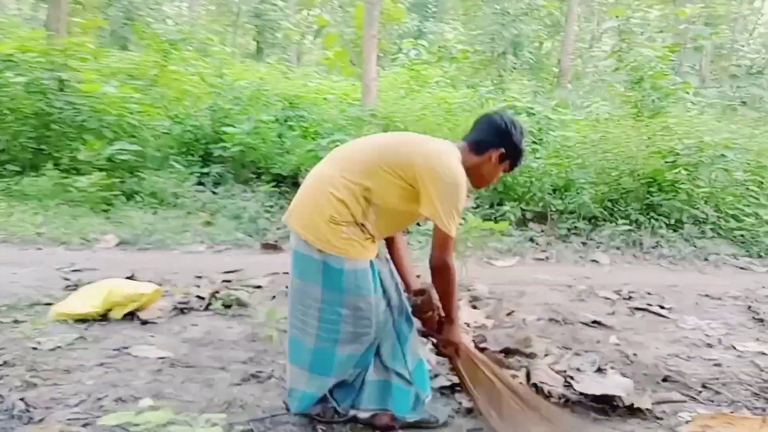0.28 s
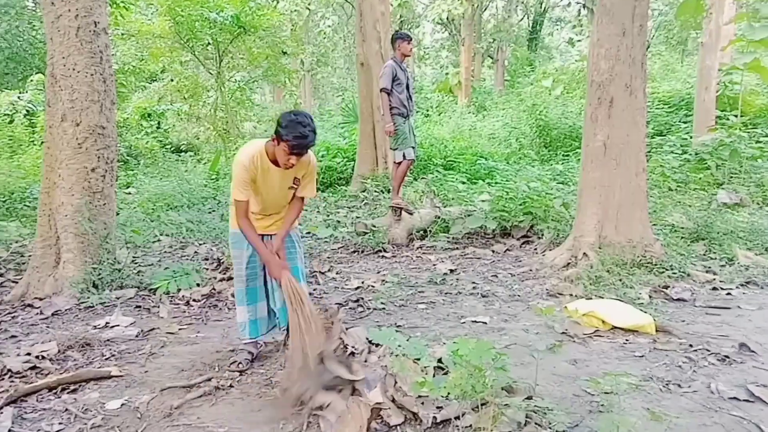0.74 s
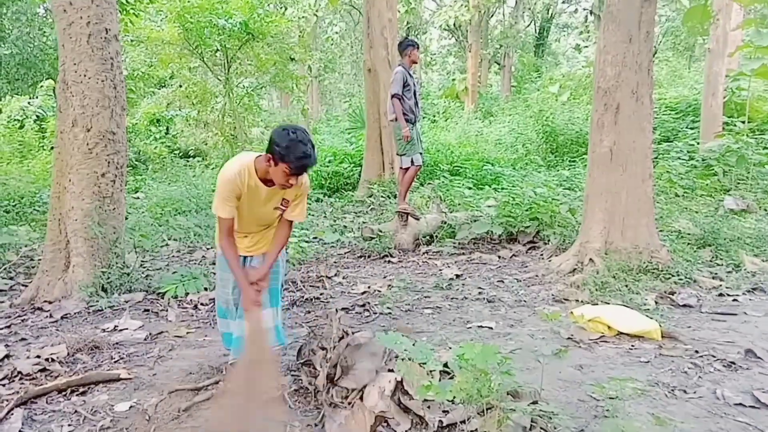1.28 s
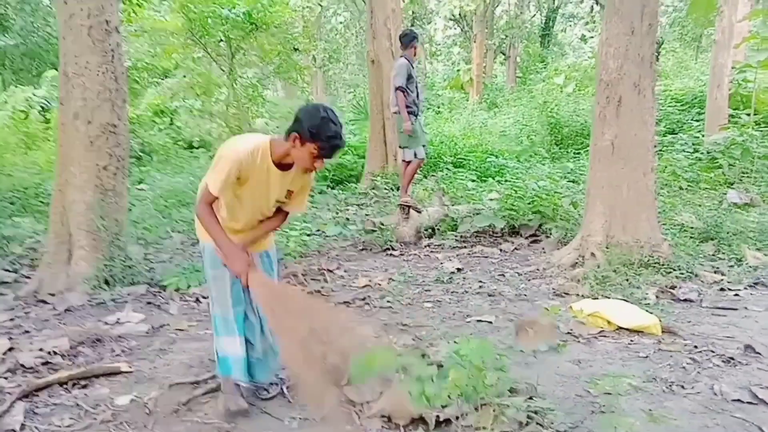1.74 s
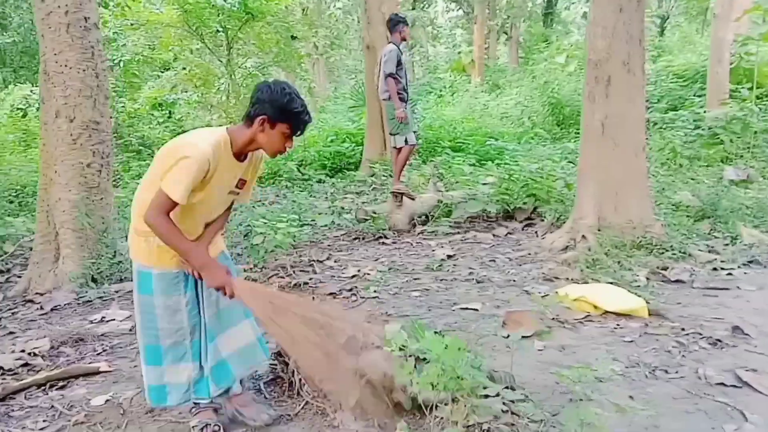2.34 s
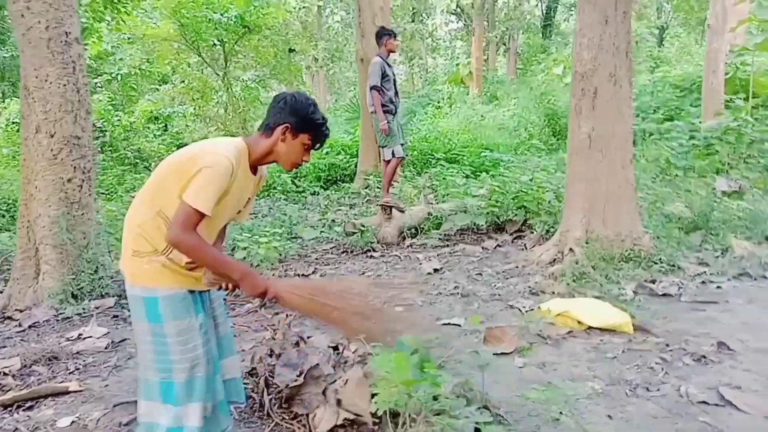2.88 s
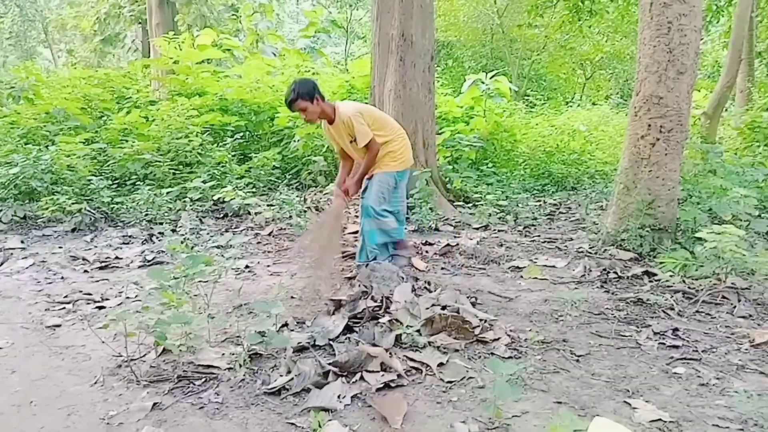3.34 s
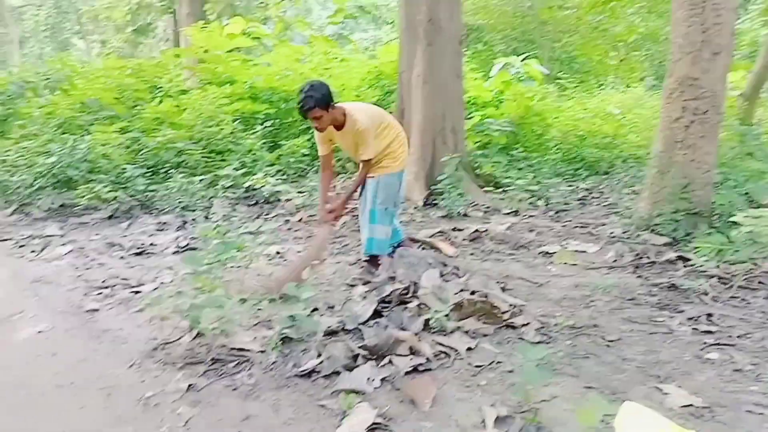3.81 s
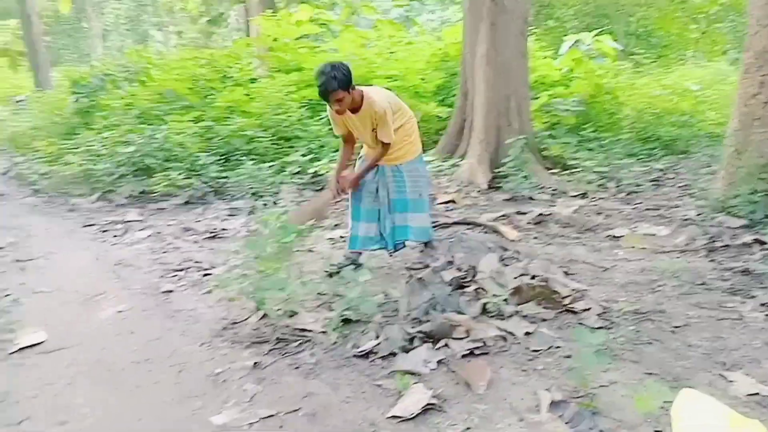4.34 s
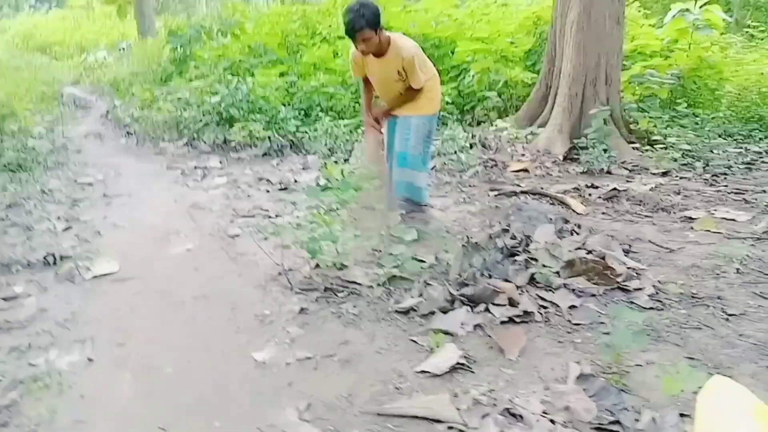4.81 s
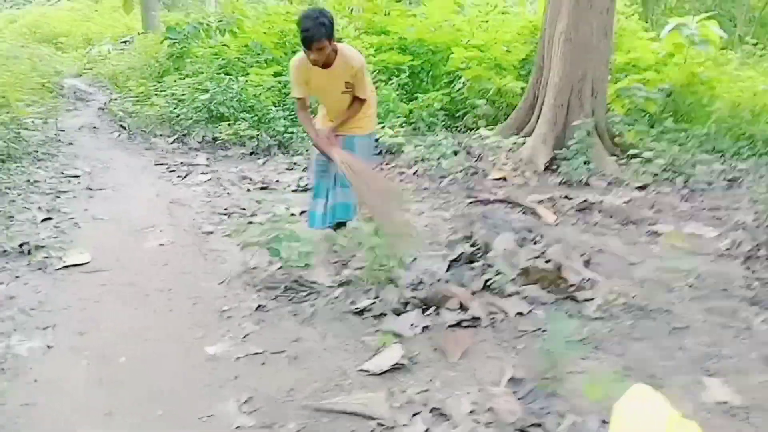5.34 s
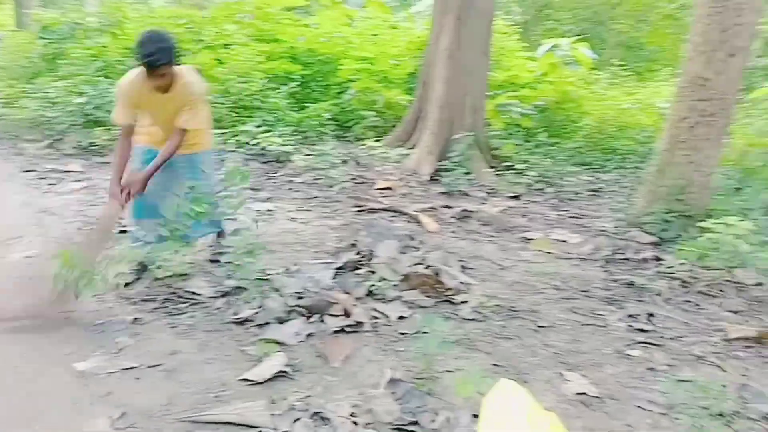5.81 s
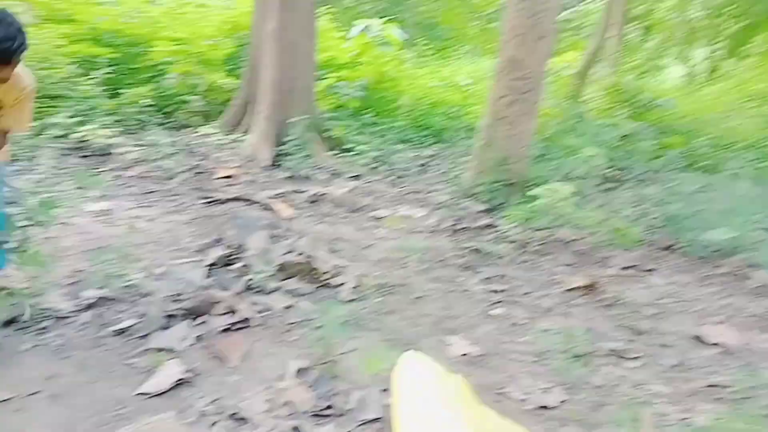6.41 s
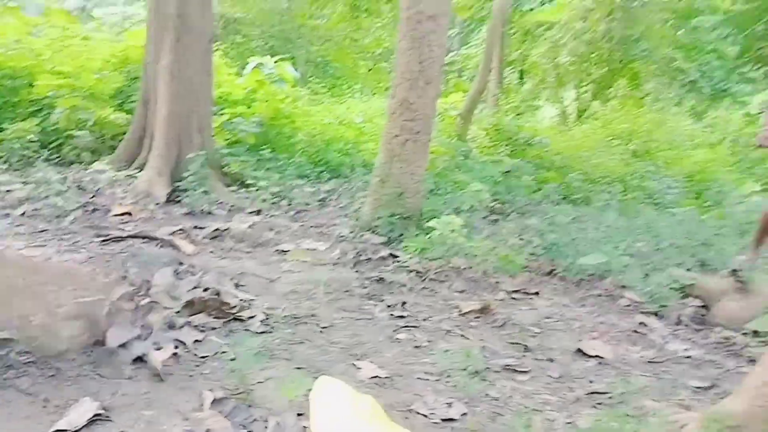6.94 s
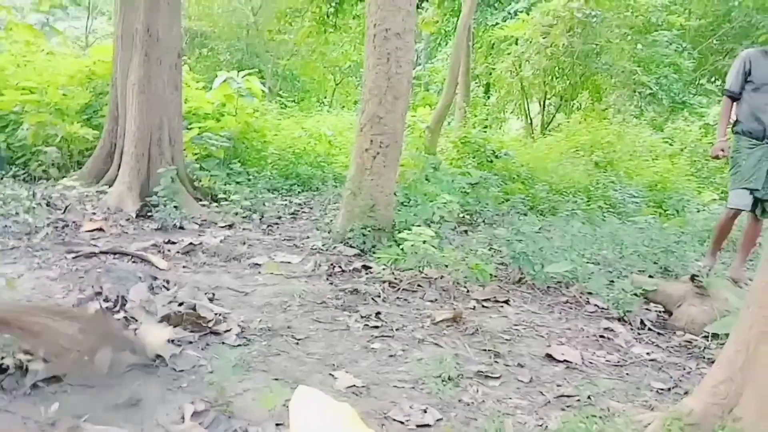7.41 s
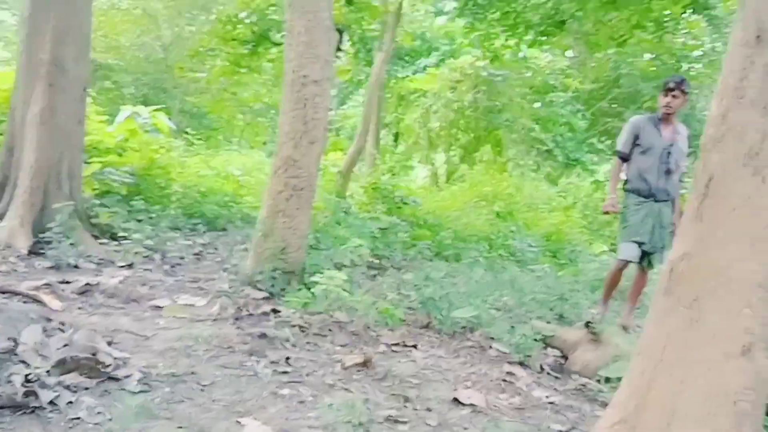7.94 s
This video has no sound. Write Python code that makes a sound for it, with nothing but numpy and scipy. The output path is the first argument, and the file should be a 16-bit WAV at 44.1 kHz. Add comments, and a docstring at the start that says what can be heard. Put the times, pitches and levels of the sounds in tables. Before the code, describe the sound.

Outdoors in woodland, a stiff twig broom scrapes dry leaves and soil near a phone microphone. The first strokes are soft and quick, then stronger crunchy swishes come singly or in pairs with short pauses. Twigs snap and leaves crackle now and then. The final strokes are loud, close and gritty. Behind lie faint foliage rustle, a thin high insect buzz and a very low far engine drone.

```python
"""Sweeping dry leaves

A short twig broom sweeps dry leaves and dirt on a woodland path, near a phone microphone.
Clumped clicks over hiss, shaped by a spectrum per layer, make the scrape of soil, rustle of leaves and hiss of grit.
Dying rings make the cracks, and narrow bands of noise make faint whistles; short echoes colour the sweeping.
Behind are rustling trees, a pulsed-noise insect, a low noise rumble and an engine built from sine orders."""
import sys
import numpy as np
from scipy import signal
from scipy.fft import rfft, irfft, next_fast_len
from scipy.io import wavfile
from scipy.ndimage import uniform_filter1d, map_coordinates

SR = 44100
rng = np.random.default_rng(int(sys.argv[2]) if len(sys.argv) > 2 else 0)


def to_wav(sig):
    """Store sig (one row per channel, or 1-D mono) as 16-bit WAV at the path in sys.argv[1].

    Samples outside -1..1 are clipped; the rate is SR.
    """
    pcm = np.clip(np.atleast_2d(sig), -1, 1) * 32767
    pcm = np.round(pcm).astype(np.int16)
    wavfile.write(sys.argv[1], SR, pcm.T)  # frames by channels


N = 360738
TIME = np.arange(N) / SR  # seconds


def gain_of(db):
    """Logarithmic level: 20 dB is a tenfold amplitude."""
    return 10 ** (np.asarray(db) / 20)


def evened(x):
    """Normalization: scales a signal to an rms of 1."""
    return x / np.sqrt(np.mean(x ** 2) + 1e-20)


def read(points, hz):
    """Interpolation of a spectrum in dB along a logarithmic frequency axis."""
    point_hz, db = np.transpose(points)
    return np.interp(np.log(hz + 1), np.log(point_hz + 1), db)


def filtered(x, order, hz, kind="low"):
    """Causal Butterworth filtering: a flat passband with smooth skirts."""
    return signal.sosfilt(signal.butter(order, hz, kind, fs=SR, output="sos"), x)


def coloured(x, spectrum, patchy_db, patch_hz, patch_s, size=256):
    """Time-varying filtering: a fixed spectrum whose level drifts in random patches of pitch and time."""
    overlap = 3 * size // 4
    hz, t, bins = signal.stft(x, SR, nperseg=size, noverlap=overlap)
    field = rng.standard_normal(bins.shape[::-1]).T
    # Gaussian blur turns independent random levels into smooth patches
    across_pitch = np.exp(-0.5 * (np.arange(-24, 25) * hz[1] / patch_hz) ** 2)
    across_time = np.exp(-0.5 * (np.arange(-100, 101) * t[1] / patch_s) ** 2)
    patches = evened(signal.fftconvolve(field, np.outer(across_pitch, across_time), "same"))
    bins = bins * gain_of(read(spectrum, hz)[:, None] + patchy_db * patches)
    shaped = signal.istft(bins, SR, nperseg=size, noverlap=overlap)[1]
    return evened(shaped[:N])


def scratch(per_s, spread_db, hiss, clump_db, clump_hz):
    """Stick-slip friction: uneven clicks over a smooth hiss, in clumps as twigs catch and slip."""
    chance, size = rng.random(N), rng.exponential(1, N)
    smooth, clump = rng.standard_normal(N), rng.standard_normal(N)
    struck = chance < per_s / SR
    clicks = struck * np.sign(smooth) * gain_of(spread_db * np.minimum(size, 4))
    clumps = evened(filtered(clump, 1, clump_hz))
    # reversed, the hiss is unrelated to the signs of the clicks
    return gain_of(clump_db * clumps) * (evened(clicks) + hiss * smooth[::-1])


# Pushes of the broom. Each row: start in seconds, rise in seconds, hold in seconds, leaf rustle in dB,
# soil scrape in dB above the rustle, grit hiss in dB above the rustle, settling litter in dB above the push.
PUSHES = [(-0.02, 0.027, 0.083, -29, -10.5, -1.5, -11), (0.117, 0.034, 0.097, -25.5, -9.5, 1, -11),
          (0.282, 0.02, 0.015, -30.5, -2.5, -15, -1.5), (0.347, 0.027, 0.02, -28.5, -10, 0.5, -6.5),
          (0.52, 0.1, 0.04, -32, -13, 4, -9), (1.03, 0.019, 0.045, -40, -9.5, -17, -17.5),
          (1.092, 0.025, 0.02, -36, -4, -10, -6), (0.876, 0.021, 0.021, -47, -34, 12, -14),
          (1.23, 0.017, 0.03, -45.5, 1, 9, -11), (1.375, 0.078, 0.01, -32, -5, 9, -18),
          (1.45, 0.038, 0.12, -13.5, -7.5, 3.5, -7.5), (2.081, 0.028, 0.04, -15, -7.5, 5.5, -3),
          (2.145, 0.07, 0.045, -14.5, -3, 4.5, -28), (2.608, 0.19, 0.06, -39, -39, 17.5, -18),
          (2.794, 0.042, 0.024, -18.5, -13, 6.5, -18.5), (2.883, 0.076, 0.094, -13, -7.5, -1.5, -8.5),
          (3.268, 0.03, 0.04, -41.5, 7, -22, -20), (3.519, 0.02, 0.02, -30.5, -9, 2, -27),
          (3.56, 0.042, 0.035, -18, -10.5, 2, -14.5), (3.659, 0.081, 0.038, -17.5, -6.5, -0.5, -8),
          (3.93, 0.082, 0.06, -40, -1, 14, -5), (4.304, 0.12, 0.028, -18, -5, -1, -6),
          (4.466, 0.032, 0.05, -21, -5, -19, -5), (4.607, 0.05, 0.032, -28.5, -19, 6, -5),
          (4.74, 0.014, 0.012, -29.5, -20, 3.5, -6), (5.048, 0.11, 0.1, -18.5, -5.5, -6.5, -9.5),
          (5.3, 0.038, 0.07, -31.5, -24, 6.5, -7), (5.645, 0.018, 0.027, -40, 4.5, -8, -20),
          (5.747, 0.024, 0.12, -27, -9.5, -2, -9), (5.85, 0.082, 0.1, -26.5, -9, 1, 1),
          (6.024, 0.044, 0.033, -31.5, -3, 12, -14), (6.132, 0.06, 0.057, -28, -1.5, -17, -8),
          (6.46, 0.059, 0.023, -19.5, -6.5, -6, -25), (6.545, 0.044, 0.006, -13, -5, -15, -29),
          (6.648, 0.012, 0.02, -15.5, -5.5, 1.5, -10.5), (6.708, 0.026, 0.044, -23.5, -5, 4, -13),
          (7.146, 0.12, 0.087, -14, -6.5, -8.5, -10.5), (7.364, 0.052, 0.054, -19, -5.5, 6, -8),
          (7.579, 0.054, 0.04, -27.5, -1.5, -17, -18), (7.848, 0.12, 0.062, -14, -8, -3, -3.5),
          (8.022, 0.044, 0.032, -15, -7.5, 2, -7)]
TOUCH_S = 0.009  # the twigs touch down
# for leaves, soil and grit in turn:
TOUCH_DB = (-14, -16.5, -9)  # level at touch-down, relative to the hold
LIFT_DB_PER_S = (-120, -110, -110)  # as the broom lifts
SETTLE_DB_PER_S = (-26, -21.5, -34.5)  # as the litter settles


def pressure(layer):
    """Incoherent summation: pushes touch down, swell, hold, lift and leave settling litter; powers add."""
    t, power = TIME[::88], 0  # a coarse time grid is enough for slow gains
    for start, rise, hold, rustle_db, soil_db, grit_db, settle_db in PUSHES:
        since = t - start
        after = np.maximum(since - rise - hold, 0)
        touch = np.clip(since / TOUCH_S, 0, 1)
        swell_db = TOUCH_DB[layer] * np.clip(1 - since / rise, 0, 1)
        lift_db = LIFT_DB_PER_S[layer] * after
        litter_db = settle_db + SETTLE_DB_PER_S[layer] * after
        layer_db = rustle_db + (0, soil_db, grit_db)[layer]
        gain = touch * gain_of(layer_db + swell_db + np.maximum(lift_db, litter_db))
        power = power + gain ** 2
    return np.interp(TIME, t, np.sqrt(power))


# Spectra of soil scrape, low drag of the heap, leaf rustle and grit hiss.
# Each row: frequency in Hz, relative density in dB per Hz.
SOIL = [(60, -60), (250, -101), (400, -9.5), (550, -2.5), (1000, -1.5), (1600, 2), (2400, -4), (3200, -41),
        (5000, -13)]
DRAG = [(60, -38), (150, -10), (280, -4), (480, -8.5), (800, -23)]
LEAVES = [(1500, -26.5), (2400, -1.5), (3200, -2), (5000, -0.5), (6000, -6.5), (7000, -2.5), (8600, -1.5),
          (10000, -2), (13000, -15.5)]
GRIT = [(3500, -26), (5300, -8), (6500, -1), (8500, -0.5), (9800, -0.5), (11500, 0), (13500, -0.5),
        (15600, -4)]
DRAG_DB, DRAG_DB_PER_S = -22, 0.72  # relative to the soil scrape, growing with the heap


def broom():
    """Friction noise: four scratching layers follow the pushes, each in its own range of pitch."""
    soil = coloured(scratch(1200, 3.1, 1.0, 0.92, 24), SOIL, 2.03, 41, 0.037, size=1024)
    drag = coloured(scratch(150, 2.9, 0.47, 3.0, 17), DRAG, 2.2, 80, 0.099, size=1024)
    soil = soil + gain_of(DRAG_DB + DRAG_DB_PER_S * TIME) * drag
    leaves = coloured(scratch(2200, 3.2, 1.1, 1.3, 40), LEAVES, 1.9, 110, 0.045, size=512)
    grit = coloured(scratch(2600, 4.2, 1.0, 1.0, 38), GRIT, 2.7, 160, 0.035, size=512)
    rustle = pressure(layer=0)
    sweep = rustle * leaves + pressure(layer=1) * soil + pressure(layer=2) * grit
    # the fainter the rustle, the hollower the sound between the two bright ranges
    rustle_db = 20 * np.log10(rustle + 1e-9)
    hollow = np.clip((-19.5 - rustle_db) / 30, 0, 0.6)
    between = signal.butter(2, [5200, 7100], "band", fs=SR, output="sos")
    return sweep - hollow * signal.sosfiltfilt(between, sweep)


# Single cracks of twigs and leaves. Each row: start in seconds, level of the ring in dB, pitch in Hz.
CRACKS = [(0.256, -13, 3900), (0.259, -22, 1890), (0.319, -25, 4300), (0.322, -19.5, 2160),
          (0.53, -21, 3270), (0.892, -33, 4140), (1.152, -23, 10050), (2.031, -10, 2330),
          (2.035, -14.5, 1970), (2.44, -13, 8800), (5.658, -17, 2240), (5.664, -23, 594),
          (5.687, -19, 1080), (5.719, -34, 4480), (5.893, -20, 4470), (5.926, -23, 3600), (5.94, -25, 3920),
          (6.11, -19, 11000), (6.751, -2, 11030), (6.771, -3, 11000), (6.833, -11, 11140),
          (7.099, -21, 1660), (7.159, -16, 1700), (7.177, -16, 4570), (7.52, -6, 11030)]
CRACK_T60_S, CRACK_ROUGH = 0.015, 0.6  # time to fall 60 dB; least roughness, as a share of the ring


def cracks():
    """Damped resonance: sudden, quickly dying rings roughened by splinters, more so at high pitch."""
    out, t = np.zeros(N + 2048), np.arange(2048) / SR
    splinters = rng.standard_normal((len(CRACKS), 2048))
    for (start, db, hz), noise in zip(CRACKS, splinters):
        grain = evened(uniform_filter1d(noise, size=3 + round(SR / hz)))
        roughness = CRACK_ROUGH + hz / 20000
        ring = np.sin(2 * np.pi * hz * t) * (1 + roughness * grain)
        out[round(start * SR):][:2048] += gain_of(db - 60 * t / CRACK_T60_S) * ring
    return filtered(out[:N], 2, 350, "high")


# Echoes off the ground and nearby trunks.
# Each row: time in seconds, near delay in milliseconds, far delay in milliseconds.
ECHOES = [(0, 0.81, 3), (0.8, 0.98, 2.2), (1.5, 1.01, 1.9), (2.75, 1, 2.27), (3.3, 0.72, 2.24),
          (5.1, 1.14, 1.68), (5.65, 0.87, 2.24), (7.198, 1.19, 2.15), (8.18, 1, 1.92)]
NEAR_SHARE, FAR_SHARE = 0.07, 0.15  # echo gains


def echoed(x):
    """Comb filtering: two short, dull echoes make bands that shift now and then."""
    s, *columns = np.transpose(ECHOES)
    near_ms, far_ms = (np.interp(TIME, s, column) for column in columns)
    dull = filtered(x, 2, 3800)

    def late(ms):
        """Variable delay: reads the dulled sound between samples."""
        return map_coordinates(dull, [np.arange(N) - ms * SR / 1000], order=3)

    return x + NEAR_SHARE * late(near_ms) + FAR_SHARE * late(far_ms)


# Faint whistles as twigs drag. Each row: start in seconds, length in seconds, pitch in Hz, level in dB.
WHISTLES = [(5.2, 0.41, 2470, -38.5), (5.78, 0.65, 1600, -35.5), (0.013, 0.17, 8350, -29)]
WHISTLE_WIDTH = 0.06  # share of the pitch


def whistles():
    """Narrow-band noise: a slim band around a pitch is heard as a whistle that swells and fades."""
    out, noise = np.zeros(N), rng.standard_normal(N)
    for start, length, hz, db in WHISTLES:
        band = [hz * (1 - WHISTLE_WIDTH / 2), hz * (1 + WHISTLE_WIDTH / 2)]
        at = slice(round(start * SR), round((start + length) * SR))
        tone = evened(filtered(noise[at], 2, band, "band"))
        out[at] += gain_of(db) * tone * np.sqrt(np.hanning(at.stop - at.start))
    return out


# Spectrum of the trees around. Each row: frequency in Hz, relative density in dB per Hz.
FOLIAGE = [(300, -4.5), (1200, 1), (4000, -18), (6000, 17.5), (9000, -22), (12000, 12), (15600, -13)]
FOLIAGE_DB = -38.5


def foliage():
    """Broadband contact noise: the faint, wide rustle of the trees around."""
    return gain_of(FOLIAGE_DB) * coloured(scratch(1500, 2.3, 1.8, 3.5, 20), FOLIAGE, 2.3, 550, 0.11)


# Loudness of the insect. Each row: time in seconds, level in dB.
INSECT = [(0.9, -72), (0.93, -38.5), (1.449, -33.5), (3.0, -44), (4.3, -40.5), (5.682, -38), (5.8, -42),
          (8.18, -59)]
INSECT_HZ, INSECT_WIDTH_HZ, INSECT_PULSES_PER_S = 10190, 810, 220  # the pulse rate is a mean


def insect():
    """Amplitude modulation: quick uneven pulses of noise in one high band."""
    s, db = np.transpose(INSECT)
    unevenness = 0.53 * uniform_filter1d(rng.standard_normal(N), 400)
    turns = np.cumsum(INSECT_PULSES_PER_S * (1 + unevenness)) / SR
    pulses = (0.6 + np.exp(-(turns % 1) / 0.28)) * rng.standard_normal(N)
    band = [INSECT_HZ - INSECT_WIDTH_HZ / 2, INSECT_HZ + INSECT_WIDTH_HZ / 2]
    buzz = filtered(pulses, 5, band, "band")
    return gain_of(np.interp(TIME, s, db)) * evened(buzz)


# Spectrum of the rumble. Each row: frequency in Hz, relative density in dB per Hz.
RUMBLE = [(20, -32), (45, -31), (85, -4), (150, -5), (200, -6.5), (270, -14.5), (350, -22.5), (520, -35)]
RUMBLE_DB = -50.5


def rumble():
    """Low-frequency noise: a distant drone, slowly lumpy."""
    return gain_of(RUMBLE_DB) * coloured(rng.standard_normal(N), RUMBLE, 2.2, 33, 0.097, size=4096)


# Engine orders. Each row: multiple of the firing rate, level running fast in dB, level running slow in dB.
ENGINE_ORDERS = [(3, -60, -68), (4, -62, -62.5), (5, -54, -54), (6, -53, -62), (7, -60, -70), (8, -60, -66)]
# Course of the engine. Each row: time in seconds, firing rate in Hz, load in dB added to every order.
ENGINE = [(0, 26, 5), (0.4, 26, 0), (1.5, 26.3, -2), (2.6, 26, -2), (3.38, 22.3, -3), (3.5, 22, 4),
          (4.0, 21.6, 0), (5.35, 21.2, 2), (5.5, 21.3, -5), (5.9, 21.8, 2), (7.3, 21.8, 0), (7.7, 21, -8),
          (8.18, 21, -8)]


def engine():
    """Harmonic series: a far engine slows down, its low orders throbbing together, each wavering in level."""
    s, *columns = np.transpose(ENGINE)
    hz, load_db = (np.interp(TIME, s, column) for column in columns)
    turns = np.cumsum(hz) / SR
    fast = np.clip((hz - 22.5) / 2.6, 0, 1)  # 0 running slow, 1 running fast
    noise = rng.standard_normal((len(ENGINE_ORDERS), N))
    wavers = uniform_filter1d(uniform_filter1d(noise, size=2500), size=2500)
    out = np.zeros(N)
    for (order, fast_db, slow_db), waver in zip(ENGINE_ORDERS, wavers):
        db = slow_db + fast * (fast_db - slow_db) + load_db + 4.2 * evened(waver)
        out += gain_of(db) * np.cos(2 * np.pi * round(order) * turns)
    return out


def scene():
    """Superposition: all sources add at one microphone, which feeds both channels."""
    sweeping = echoed(broom() + cracks()) + whistles()
    background = foliage() + insect() + rumble() + engine()
    return np.tile(sweeping + background, (2, 1))


# Response of the microphone and its port. Each row: frequency in Hz, gain in dB.
MIC = [(300, 1), (2900, 0.5), (3600, 6), (4500, 6), (5100, -1.5), (5900, -5.5), (6800, -2), (7800, 3),
       (9000, -0.5), (15600, -0.5)]
KNEE = 1.25  # level the soft bend approaches, where full scale is 1
EDGE_HZ = 15560  # band limit


def record(dry):
    """Resonance and saturation: port resonances, a preamp that bends and clips at full scale, a band limit."""
    size = next_fast_len(N)
    response = gain_of(read(MIC, np.fft.rfftfreq(size, 1 / SR)))
    heard = irfft(rfft(dry, size) * response, size)[:, :N]
    clipped = np.clip(KNEE * np.tanh(heard / KNEE), -1, 1)
    lowpass = signal.firwin(1023, EDGE_HZ, window=("kaiser", 9), fs=SR)
    return signal.oaconvolve(clipped, lowpass[None], "same")


dry = scene()
out = record(dry)
to_wav(out)
```